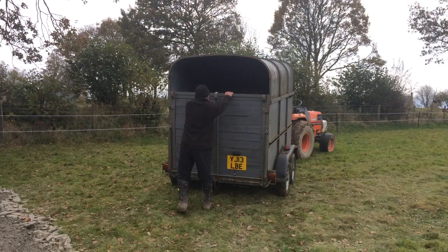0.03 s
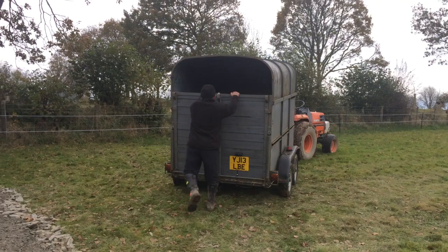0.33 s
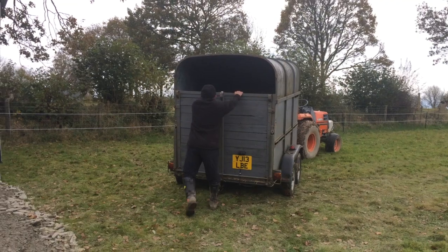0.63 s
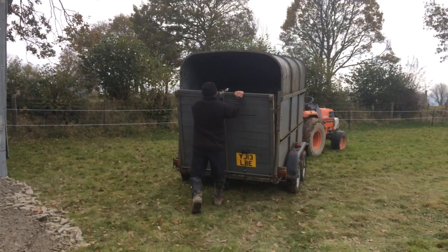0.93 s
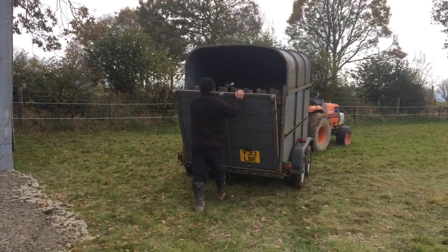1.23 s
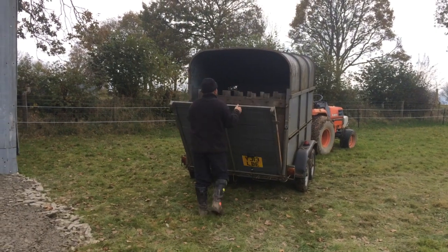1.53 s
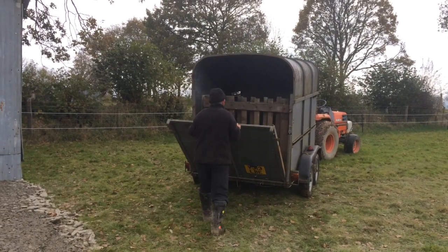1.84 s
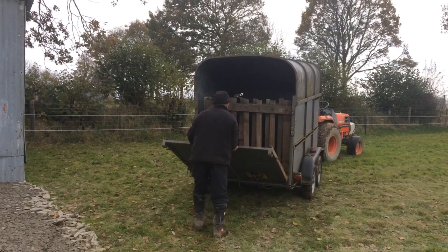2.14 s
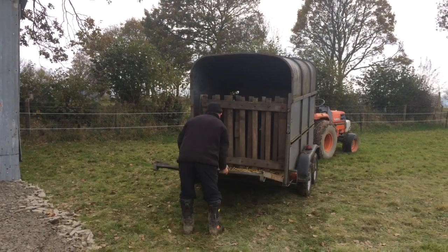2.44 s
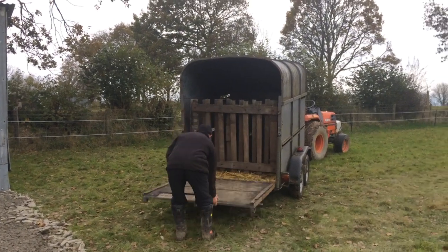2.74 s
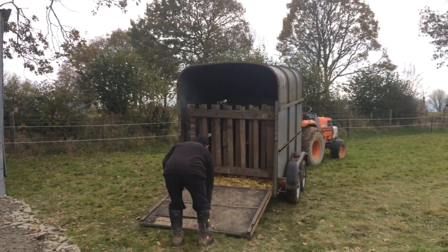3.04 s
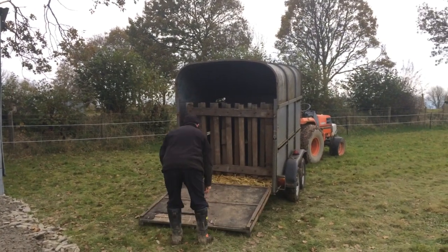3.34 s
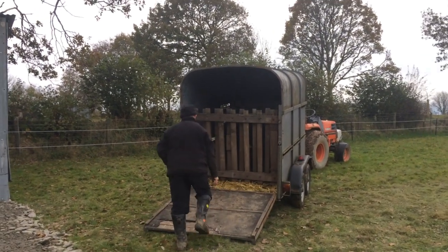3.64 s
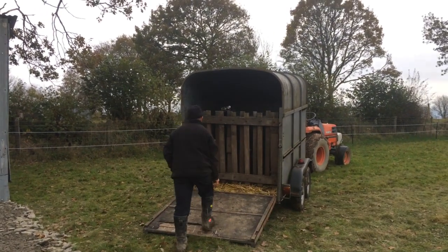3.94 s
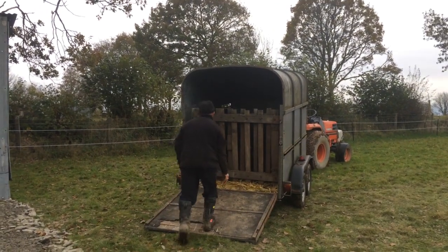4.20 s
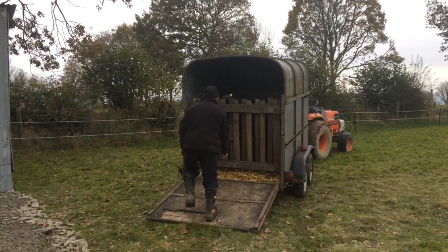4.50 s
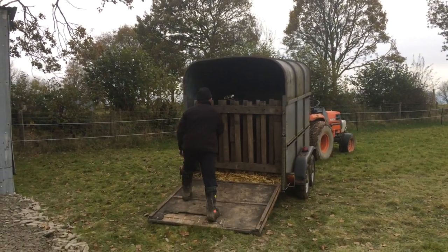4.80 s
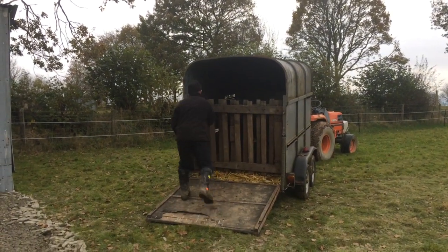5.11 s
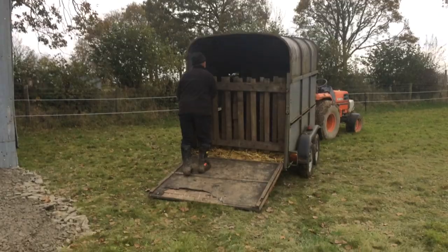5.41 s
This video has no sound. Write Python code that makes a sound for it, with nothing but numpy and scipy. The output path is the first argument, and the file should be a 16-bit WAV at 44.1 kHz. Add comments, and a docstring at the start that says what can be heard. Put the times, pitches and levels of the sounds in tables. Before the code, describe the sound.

A small tractor idles with a low, quiet throb throughout, outdoors, with the microphone a few metres from a horse trailer. From about 0.1 to 0.4 seconds the trailer's ramp jars in its steel frame with several clangs, a latch snap and a hollow boom from the body. The loudest clangs come at around 0.8 seconds, followed by sharp latch cracks at 1.0 and 1.2 seconds. From 1.4 to 3.2 seconds the ramp is lowered: its coil springs slip and twang again and again, more often after 2 seconds, with gritty hinge scraping and a low shudder. It settles with a soft bump at about 3.2 seconds. Between 3.6 and 4 seconds the hinge gives a small chirp and faint squeaks under weight. Rubber boots knock dully on the boards at about 4.1 and 5.5 seconds, with a few tiny ticks of grit.

```python
"""Outdoors on grass, the microphone a few metres from a horse trailer; a small tractor idles throughout.
The ramp is pulled free: it clangs in its steel frame, the hollow body booms and the latches snap.
As it is lowered, the hinge rubs and its coil springs slip and twang, winding up; the ramp shudders.
Last, boots tread up the boards and the hinge squeaks faintly under the weight."""
import sys
import numpy as np
from scipy import signal
from scipy.fft import rfft, irfft
from scipy.io import wavfile

SR = 44100
rng = np.random.default_rng(int(sys.argv[2]) if len(sys.argv) > 2 else 0)


def dump(signal):
    """Clip the signal to [-1, 1] and save it as 16-bit WAV at the path in sys.argv[1]."""
    limited = np.clip(np.atleast_2d(signal).T, -1, 1)
    pcm = np.round(limited * 32767).astype(np.int16)
    wavfile.write(sys.argv[1], SR, pcm)


N = 245195


def gain_of(db):
    """Decibels to a factor."""
    return 10 ** (np.asarray(db) / 20)


def unit_rms(x):
    """Scales to rms 1."""
    return x / np.sqrt(np.mean(x ** 2) + 1e-20)


def read(points, hz):
    """Reads a table on a logarithmic frequency axis."""
    f, value = np.transpose(points)
    return np.interp(np.log(hz + 1), np.log(f + 1), value)


def add(mix, s, sound):
    """Mixes a sound in at s seconds."""
    part = mix[max(round(s * SR), 0):][:len(sound)]
    part += sound[:len(part)]


def drift(rate_hz, size):
    """A random wander of rms 1, mostly slower than rate_hz."""
    hz = np.fft.rfftfreq(size, 1 / SR)
    return unit_rms(irfft(rfft(rng.standard_normal(size)) * np.exp(-(hz / rate_hz) ** 2) * (hz > 0), size))


def noise(points):
    """Steady noise of rms 1 with the given spectrum."""
    gains = gain_of(read(points, np.fft.rfftfreq(N, 1 / SR)))
    return unit_rms(irfft(rfft(rng.standard_normal(N)) * gains, N))


def colour(x, db_at, size=4096):
    """Causal filter whose gain in dB is the function db_at(Hz)."""
    log_gain = np.log(gain_of(db_at(abs(np.fft.fftfreq(size, 1 / SR)))))
    taps = np.fft.ifft(np.exp(np.conj(signal.hilbert(log_gain)))).real
    return signal.oaconvolve(x, taps[:size // 2])[:len(x)]


def lumps(depth_db, width_hz):
    """Uneven heights of clustered resonances in dB, as a function of frequency; the bass stays even."""
    knots = depth_db * np.clip(rng.standard_normal(2000), -2, 2)
    return lambda hz: np.interp(hz / width_hz, np.arange(len(knots)), knots) * hz / (hz + 900)


def dense_ring(t60s, stretch=1, size=256):
    """One second of countless overlapping modes, each band dying at its own speed."""
    hz, t, bands = signal.stft(rng.standard_normal(SR), SR, nperseg=size)
    fade = np.exp(-np.log(1000) * t / (stretch * read(t60s, hz)[:, None]))
    return signal.istft(bands * fade, SR, nperseg=size)[1][:SR]


def clear_ring(modes, stretch=1, spread_db=2):
    """One second of distinct modes; each blow excites them a little differently."""
    t = np.arange(SR) / SR
    ring = np.zeros(SR)
    for hz, db, t60 in modes:
        strength, phase = rng.random(2)
        fade = np.exp(-np.log(1000) * t / (stretch * t60))
        ring += gain_of(db + spread_db * (2 * strength - 2.5)) * fade * np.sin(2 * np.pi * (hz * t + phase))
    return ring


def tractor(firing_hz=35.8, hunt=0.007, flutter=0.15, wash_db=-48.5, tick_db=-56, tick_s=0.0047):
    """Idling exhaust tones, a distant wash that throbs slightly, and a dry tick with each firing."""
    # Exhaust tones. Each row: multiple of the firing rate, rms level in dB.
    exhaust = [(1, -62), (2, -61), (3, -50), (4, -60.5), (5, -57.5), (6, -59.5), (7, -79), (8, -74.5)]
    # Distant engine clatter and open air. Each row: frequency in Hz, relative level in dB.
    air = [(15, -47), (35, -12.5), (110, -10), (200, -15.5), (330, -19), (450, -27.5), (700, -19),
           (950, -25), (1250, -23), (1800, -29.5), (2350, -27), (2650, -34), (6300, -41.5), (9000, -47),
           (16000, -54.5)]
    # The tick of a firing. Each row: frequency in Hz, relative level in dB.
    clatter = [(900, -26), (2200, 0.5), (2800, -9), (4500, -8.5), (7000, -15.5), (16000, -20.5)]
    firings = np.cumsum(firing_hz * (1 + hunt * drift(3.8, N))) / SR
    tones = np.zeros(N)
    for multiple, db in exhaust:
        level = gain_of(db) * np.sqrt(2) * (1 + flutter * drift(20, N))
        tones += level * np.sin(2 * np.pi * (round(multiple) * firings + rng.random()))
    throb = 1 + .16 * np.cos(2 * np.pi * firings)
    ticks = np.exp(-(firings % 1) / (firing_hz * tick_s)) * gain_of(tick_db + 2.5 * drift(23, N))
    return tones + gain_of(wash_db) * noise(air) * throb + ticks * noise(clatter)


def clang(db, tilt_db, stretch=0.79, modes_db=-1.5, rise_s=0.00098, chatter_db=3.5, pivot_hz=1500):
    """Steel grinds on steel: a chattering blow of the ramp rings the frame."""
    # The frame's dense ring. Each row: frequency in Hz, gain in dB.
    spectrum = [(30, -25), (70, 2), (150, -3.5), (350, -3), (750, -4), (1400, -3.5), (2900, -10.5),
                (3600, -3), (4750, 2.5), (5200, -9), (7500, -9.5), (10000, -16.5), (13500, -22),
                (16000, -25)]
    # Its decay. Each row: frequency in Hz, T60 in seconds before the factor stretch.
    t60s = [(100, 0.2), (400, 0.54), (900, 0.7), (2000, 0.55), (4500, 0.24), (9000, 0.22), (15000, 0.15)]
    # The strongest modes. Each row: frequency in Hz, relative level in dB, T60 in seconds before stretch.
    modes = [(270.6, -23.5, .9), (688, -16.5, 1.0), (816, -15.5, 0.33), (1133, -32, 0.75),
             (1389, -18, 0.37), (1910, -19, 0.49), (2744, -22, 0.34), (3545, -11, 0.13), (3772, -12, 0.11),
             (4087, -8, 0.18), (4182, -11, 0.15), (4669, -10, .14), (4765, -8, 0.13), (7550, -11.5, 0.073)]
    dense = dense_ring(t60s, stretch) * gain_of(chatter_db * drift(160, SR))
    clusters = lumps(depth_db=3.5, width_hz=60)
    ring = colour(dense, lambda hz: read(spectrum, hz) + clusters(hz))
    ring += gain_of(modes_db) * clear_ring(modes, stretch)
    attack = 1 - np.exp(-np.arange(SR) / SR / rise_s)
    # softer contacts lose their treble
    return colour(ring * attack, lambda hz: db + tilt_db * np.log2(1 + hz / pivot_hz))


def boom(db, hz, rise_s=0.0038, decay_s=0.013, rumble_db=14, rumble_s=0.094):
    """A panel swings a few times and sets the trailer's hollow body rumbling."""
    # The body's resonance. Each row: frequency in Hz, gain in dB.
    body = [(20, -41), (45, -12.5), (90, 2.5), (150, -2.5), (220, -6.5), (400, -10), (900, -18),
            (3000, -50)]
    t = np.arange(SR // 2) / SR
    panel = 2 * np.sin(2 * np.pi * hz * t) * np.exp(-t / decay_s)
    burst = rng.standard_normal(len(t)) * np.exp(-t / rumble_s)
    rumble = colour(burst, lambda f: rumble_db + read(body, f))
    return gain_of(db) * (panel + rumble) * (1 - np.exp(-t / rise_s))


def jolt(db, hz, gap_s, change_db, bumps=4, rest_hz=85, settle=0.46):
    """The ramp bumps to and fro, booming the body, each bump weaker and lower than the last."""
    out = np.zeros(SR)
    for k in range(bumps):
        add(out, k * gap_s, boom(db + k * change_db, rest_hz + (hz - rest_hz) * settle ** k))
    return out


def hinge(grit_db=2, judder_db=2):
    """Rusty steel rubs with a gritty hiss, the coils scrape on each other, and the ramp shudders."""
    # Spells of rubbing. Each row: start and length in seconds, peak levels of hiss and scrape in dB.
    rubs = [(0.147, 0.15, -46, -48.5), (2.09, 0.37, -56.5, -88), (2.453, 0.18, -56, -40),
            (2.916, 0.17, -60, -41), (3.067, 0.16, -56, -44)]
    # The ramp's shudder as it swings down and settles. Each row: time in seconds, level in dB.
    shudder = [(1.4, -52.5), (1.95, -43), (2.13, -57), (2.65, -39), (3.05, -39.5), (3.2, -36.5),
               (3.42, -44.5), (3.65, -47.5), (3.95, -55)]
    # Spectra of hiss, scrape and shudder. Each row: frequency in Hz, relative level in dB.
    hiss_spectrum = [(200, -30), (1500, -7), (4000, 6), (8000, 4), (13500, -3), (16000, -15)]
    scrape_spectrum = [(400, -42), (1600, -32), (2150, 8), (2700, 3), (3250, 7.5), (3800, -10), (4600, -33),
                       (12000, -49)]
    shudder_spectrum = [(20, -30), (45, -10), (90, -3), (150, 1), (185, -3), (215, -12), (270, -6.5),
                        (450, -14.5), (2000, -72)]
    hiss, scrape = np.zeros((2, N))
    for s, length, hiss_db, scrape_db in rubs:
        swell = np.sin(np.pi * np.arange(0, length, 1 / SR) / length)
        add(hiss, s, gain_of(hiss_db) * swell)
        add(scrape, s, gain_of(scrape_db) * swell)
    times, shudder_db = np.transpose(shudder)
    rumble = np.interp(np.arange(N) / SR, times, gain_of(shudder_db), left=0, right=0)
    rubbing = hiss * noise(hiss_spectrum) * gain_of(grit_db * drift(200, N))
    scraping = scrape * noise(scrape_spectrum) * gain_of(judder_db * drift(120, N))
    return rubbing + scraping + rumble * noise(shudder_spectrum)


def snap(db, decay_s=0.0011, rise_s=0.0012, echo_s=0.018, echo_db=-12, tail_db=-28, tail_s=0.033):
    """A latch cracks or grit ticks; the trailer's wall throws back one echo and a short wash."""
    # The latch's tone colour. Each row: frequency in Hz, gain in dB.
    latch = [(100, -5), (500, 1), (950, -2), (1400, 10.5), (1900, -4), (2350, 4), (2800, -1), (4300, 4),
             (6700, -1.5), (8000, 0), (10500, -6.5), (14000, -14), (16000, -22)]
    t = np.arange(SR // 4) / SR
    crack = 2 * rng.choice([-1, 1], len(t)) * np.exp(-t / decay_s) * (1 - np.exp(-t / rise_s))
    out = crack + gain_of(tail_db) * rng.standard_normal(len(t)) * np.exp(-t / tail_s)
    add(out, echo_s, gain_of(echo_db) * crack)
    return colour(out, lambda hz: db + read(latch, hz))


def twang(register_db, slip_s=0.0043, direct=0.72, bounce=0.27, scatter_s=.003, swell_s=0.039,
          modes_db=-2, overtone_db=-17, overtone_t60=0.33):
    """A gritty slip is heard at once and also runs along the coil, each pitch at its own speed."""
    # Travel along the coil. Each row: frequency in Hz, time for one crossing in seconds.
    travel = [(100, .001), (1200, 0.000953), (2600, 0.0048), (3600, 0.0079), (5000, 0.01), (7000, .012),
              (8500, 0.0082), (10300, 0.0059), (12000, 0.00093), (14000, 0.0047)]
    # The spring's tone colour. Each row: frequency in Hz, gain in dB.
    spectrum = [(40, -23), (150, -8.5), (230, -10), (330, 2.5), (700, 2), (1300, -3.5), (2000, -1),
                (3400, -5), (4900, -10), (6800, -12.5), (8400, -7), (9500, -14.5), (10400, -2.5),
                (11000, -11), (15500, -29.5)]
    # Decay of its dense ring. Each row: frequency in Hz, T60 in seconds.
    t60s = [(120, 2.1), (350, 1.3), (750, 1.74), (1500, 0.62), (3000, 0.34), (6000, 0.28), (10000, 0.11),
            (14500, 0.16)]
    # Its standing waves. Each row: nominal frequency in Hz, relative level in dB, T60 in seconds.
    modes = [(294, -16, 0.89), (320.4, -12, 0.83), (350.3, -8.5, 1.07), (380, -19, 0.91), (531, -15, 0.45),
             (633, -16.5, 2), (694, -18.5, 2.55), (811, -23, 2.1), (951, -21.5, 1.9), (1108, -29, 4.3)]
    # The range of the wire's clear overtones: lowest and highest in Hz.
    wire_hz = [1842, 4130]
    # The centres of hum, drone, twang and zing in Hz; register_db gives a gain for each.
    registers_hz = [360, 700, 2300, 9000]
    t, hz = np.arange(SR) / SR, np.fft.rfftfreq(SR, 1 / SR)
    crossing = np.exp(-2j * np.pi * np.cumsum(read(travel, hz)))
    grit = rfft(1.75 * rng.standard_normal(SR) * np.exp(-t / slip_s))
    passes = grit * sum((-bounce) ** k * crossing ** (2 * k) for k in range(4))
    blur = dense_ring(t60s) * (1 - np.exp(-t / scatter_s)) * np.minimum(1, 10 * (1 - t))
    # the resonances change from slip to slip
    clusters = lumps(depth_db=4, width_hz=110)
    detune = 1 + .012 * rng.uniform(-1, 1)
    overtones = clear_ring([(f, overtone_db, overtone_t60) for f in rng.uniform(*wire_hz, 12)])
    wire = irfft(direct * grit + crossing * (passes + rfft(blur + overtones)), SR)
    wire = colour(wire, lambda f: read(spectrum, f) + clusters(f))
    for mode_hz, db, t60 in modes:
        # the low standing waves need a few passes to build up
        build_up = 1 - np.exp(-t * mode_hz / (swell_s * registers_hz[0]))
        wire += clear_ring([(mode_hz * detune, db + modes_db, t60)]) * build_up
    return colour(wire, lambda f: read(list(zip(registers_hz, register_db)), f))


def knock(hz, db, spread=0.069, count=6, t60=.12):
    """A short ring of one turn of wire: a tight cluster of modes."""
    t = np.arange(SR // 3) / SR
    offsets = (np.arange(count) + rng.random(count)) * 2 / count - 1
    modes = sum(np.sin(2 * np.pi * (f * t + rng.random())) for f in hz * (1 + spread * offsets))
    return gain_of(db) * np.sqrt(2) * unit_rms(modes) * np.exp(-np.log(1000) * t / t60)


def coil_slip(s, db, sharpness_db, turn_hz, tight_s=2.333, tighten_s=0.076, boost_db=2.5, octaves=0.15):
    """A turn knocks and the spring twangs: a slack spring hums, a tight one less; sharp slips add zing."""
    # Short, high turns knock less. Each row: pitch in Hz, level against the slip in dB.
    knock_db = [(600, -7.5), (1570, -9), (2100, -14), (3700, -21.5)]
    tight = .5 + .5 * np.tanh((s - tight_s) / tighten_s)  # 0 with the coils open, 1 closed up
    hum_db = 8.5 * (1 - tight) - 4 * tight
    drone_db = 5 * (1 - tight) + tight + 0.29 * sharpness_db  # a sharp slip drives the drone harder
    out = twang(db + np.array([hum_db, drone_db, 0, sharpness_db]))
    # the twang is lifted around the slipping turn's pitch
    out = colour(out, lambda hz: boost_db * np.exp(-(np.log2((hz + 1) / turn_hz) / octaves) ** 2))
    add(out, 0, knock(turn_hz, db + read(knock_db, turn_hz)))
    return out


def step(db, rise_s=0.0017, decay_s=0.021):
    """A rubber boot gives the boards a dull knock."""
    # The boards' tone colour. Each row: frequency in Hz, gain in dB.
    boards = [(60, 9), (200, 10), (480, -6.5), (800, -6.5), (1500, -5), (4000, -12), (16000, -36)]
    t = np.arange(SR // 4) / SR
    blow = rng.standard_normal(len(t)) * np.exp(-t / decay_s) * (1 - np.exp(-t / rise_s))
    return colour(blow, lambda hz: db + read(boards, hz))


def squeak(length, first_hz, last_hz, db, echo_decay_s=.06):
    """A thin, broken tone of a dry hinge that sticks and slips, blurred by the trailer's box."""
    size = int(length * SR)
    hz = np.linspace(first_hz, last_hz, size) * (1 + .025 * drift(400, size))
    grip = unit_rms(gain_of(4 * drift(90, size)))
    tone = gain_of(db) * grip * signal.windows.tukey(size, .5) * np.sin(2 * np.pi * np.cumsum(hz) / SR)
    echoes = rng.standard_normal(SR // 4) * np.exp(-np.arange(SR // 4) / SR / echo_decay_s)
    echoes *= .5 / np.linalg.norm(echoes)
    echoes[0] = 1  # the direct path to the microphone
    return signal.fftconvolve(tone, echoes) / np.linalg.norm(echoes)


def squeal(length, db, sag=0.049):
    """The hinge's modes squeak together and sink a little in pitch."""
    # The hinge's modes. Each row: starting frequency in Hz, relative level in dB.
    modes = [(3300, 2), (5030, -1.5), (5450, -2), (6050, -5), (7150, -4.5)]
    return sum(squeak(length, hz, hz * (1 - sag), db + mode_db) for hz, mode_db in modes)


def scene():
    """Tractor, ramp and boots in the open air, at one microphone a few metres from the trailer."""
    # The ramp jars in its frame. Each row: start in seconds, level in dB, treble tilt in dB per octave.
    clangs = [(.124, -25.5, -7), (.180, -22.5, -1.5), (.290, -21, -12.5), (.328, -18.5, -18.5),
              (.405, -41, -8), (.766, -20.5, -10), (.786, -14, 1.5), (.800, -11.5, -4.5), (.895, -25, -7),
              (.991, -23, -4), (1.229, -28, -4)]
    # The ramp is jolted. Each row: start in seconds, level in dB, first pitch in Hz,
    # gap between bumps in seconds, change per bump in dB.
    jolts = [(.131, -22.5, 140, 0.05, -2.5), (.766, -20.5, 132, 0.065, -7), (.834, -18.5, 111, .069, -3.5),
             (1.135, -29.5, 87, .088, -1.6), (3.195, -29.5, 141, .07, -2)]
    # Latches and small ticks of grit. Each row: start in seconds, level in dB.
    snaps = [(.1805, -15.5), (.9935, -7), (.9955, -5.5), (1.2288, -7.5), (1.413, -37), (1.629, -34.5),
             (3.198, -35), (4.110, -32.5), (4.158, -40), (4.353, -37.5)]
    # A coil slips. Each row: start in seconds, level in dB, sharpness in dB, the turn's pitch in Hz.
    slips = [(1.436, -33.5, -4.5, 3470), (1.671, -24.5, 1, 595), (1.832, -24.5, -5.5, 1964),
             (2.169, -27.5, 2.5, 1625), (2.241, -24.5, -10, 2350), (2.412, -27.5, -8.5, 2390),
             (2.467, -23, -1.5, 3670), (2.515, -25.5, -9, 2050), (2.6221, -20.5, 0, 2107),
             (2.748, -20.5, 1.5, 1520), (2.921, -25, 2, 1547), (2.982, -28, -6.5, 3130),
             (3.093, -24.5, 3.5, 2390), (3.125, -26, -9, 2710), (3.217, -27.5, 3.5, 1460)]
    # Boots land on the boards. Each row: start in seconds, level in dB.
    steps = [(3.478, -48), (4.110, -28), (5.457, -32.5), (5.485, -38)]
    # The hinge pin breaks loose with a rising chirp.
    # Each row: start and length in seconds, first and last pitch in Hz, level in dB.
    chirps = [(3.622, .045, 1580, 1810, -41)]
    # The hinge squeals as the ramp takes weight. Each row: start and length in seconds, level in dB.
    squeals = [(3.65, .11, -54.5), (3.765, .07, -61.5), (3.86, .18, -63.5)]
    mix = tractor() + hinge()
    for table, source in ((clangs, clang), (snaps, snap), (jolts, jolt), (squeals, squeal), (chirps, squeak)):
        for s, *row in table:
            add(mix, s, source(*row))
    for s, *row in slips:
        add(mix, s, coil_slip(s, *row))
    for s, db in steps:
        add(mix, s, step(db))
        add(mix, s, boom(db - 8, hz=122))  # the body booms under each boot
    return mix[None]


def record(dry, start_s=.083, edge_hz=16000):
    """The microphone opens after a moment of silence and hears up to edge_hz."""
    opened = dry * (np.arange(N) >= start_s * SR)
    lowpass = signal.firwin(255, edge_hz, window=("kaiser", 9), fs=SR)
    return signal.oaconvolve(opened, lowpass[None], "same")


dry = scene()
out = record(dry)
dump(out)
```